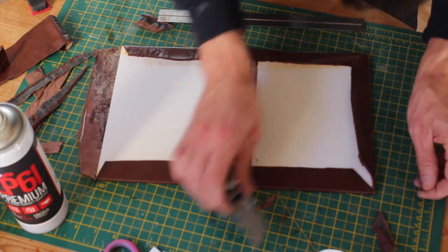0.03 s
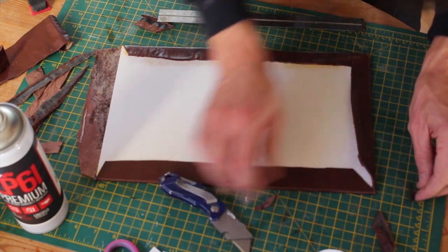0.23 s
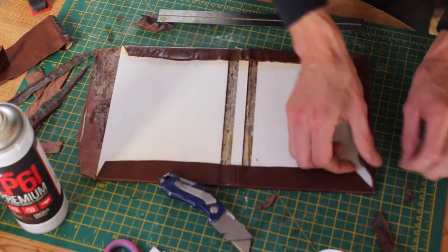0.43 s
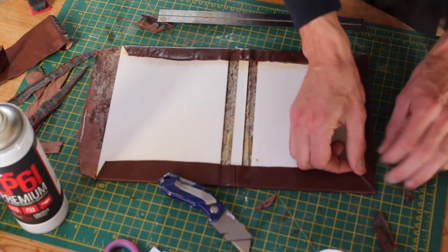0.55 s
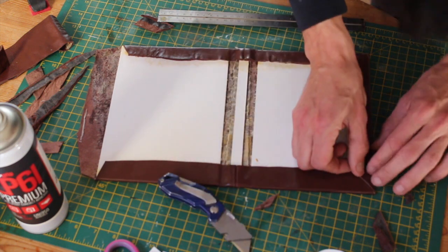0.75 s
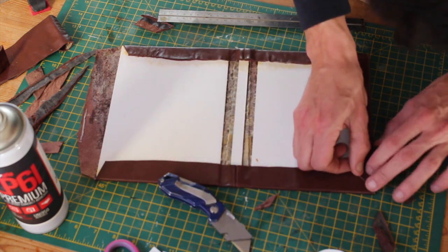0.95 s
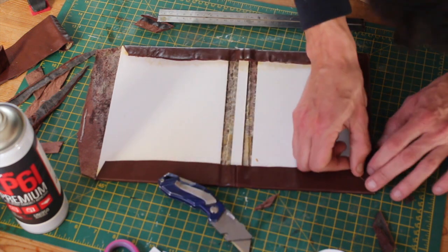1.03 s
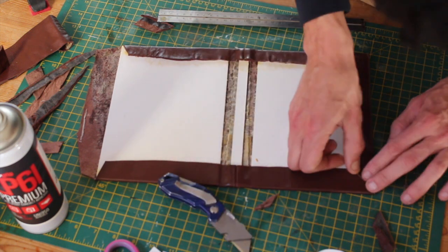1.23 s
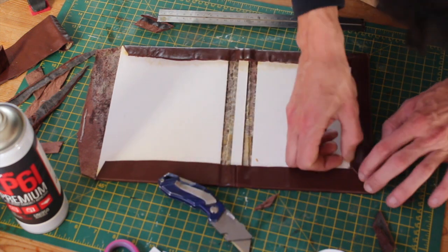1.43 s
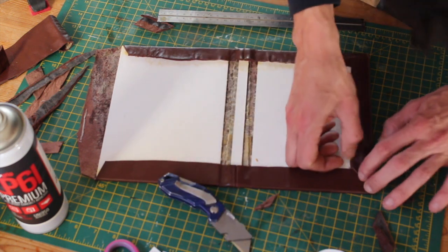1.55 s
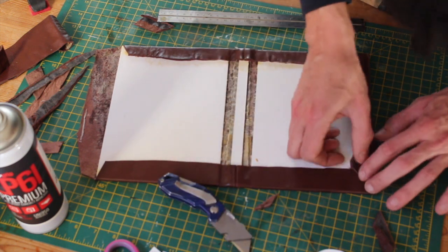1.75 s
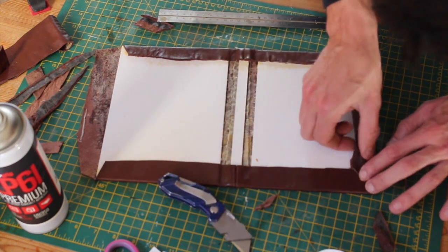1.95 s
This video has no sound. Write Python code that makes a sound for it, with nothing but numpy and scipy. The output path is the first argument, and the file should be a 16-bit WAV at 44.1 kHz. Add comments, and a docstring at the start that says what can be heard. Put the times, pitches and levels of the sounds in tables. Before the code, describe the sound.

Heard from above a table, a folding knife lands on a cutting mat with a sharp clack, a brief metallic rattle and a hollow knock. Fingers then softly rub and tap leather and card in a small, faintly humming room.

```python
"""Folding knife dropped on a cutting mat.

The handle clacks down, the metal parts rattle as it tips over, the table booms under it.
Before that it ticks in the hand; afterwards fingers tap, rub and squeak on card and leather.
A small live workroom with a faint hum answers, heard from above the table."""
import sys
import numpy as np
from scipy import signal
from scipy.fft import rfft, irfft
from scipy.io import wavfile
from scipy.ndimage import map_coordinates

SR = 44100
rng = np.random.default_rng(int(sys.argv[2]) if len(sys.argv) > 2 else 0)


def persist_wave(psi):
    """Save psi, clipped to +-1, as 16-bit WAV."""
    counts = np.round(np.clip(psi, -1, 1) * 32767).astype(np.int16)
    wavfile.write(sys.argv[1], SR, np.atleast_2d(counts).T)


N = 88200
T = np.arange(N) / SR
FFT_SIZE = 2 * N
FREQ_HZ = np.fft.rfftfreq(FFT_SIZE, 1 / SR)

# Knife landings and the quick room slap just after the first clack. Each row: start in seconds,
# clack in dB, rattle in dB, chatter in seconds, table knock in dB, table sway in dB.
HITS = [(0.2275, -14, -35, 0.00064, -14.5, -46), (0.2309, -15.5, -34, 0.00034, -30.5, -51),
        (0.262, -25, -23, 0.0036, -20.5, -60), (0.2652, -20, -23, 0.0027, -11.5, -28.5),
        (0.2744, -36, -38, 0.00072, -33, -61), (0.3253, -18.5, -26, 0.0044, -36, -31),
        (0.383, -24.5, -55, .001, -30, -49)]
# Modes of handle, blade and clip, carried knife, table top and table on its legs.
# Each row: frequency in Hz, level in dB, T60 in seconds.
HANDLE_MODES = [(693, -29, .25), (752, -23.5, 0.17), (790, -24, 0.16), (1004, -27.5, 0.28),
                (1126, -20.5, 0.16), (1400, -18, 0.099), (1550, -27, 0.15), (1946, -36, 0.044),
                (2154, -25.5, 0.085), (2534, -15, 0.075)]
METAL_MODES = [(2260, -37, .09), (2910, -16, .16), (3070, -21, 0.22), (4680, -25, 0.077), (5130, -33, 0.12)]
TICK_MODES = [(2240, -25, 0.16), (2620, -21, 0.2), (2755, -14, 0.15), (6000, -25, 0.17)]
TOP_MODES = [(193.4, -19, 0.23), (210.7, -12, 0.3), (231.4, -0.5, 0.088), (277.3, -6, 0.15),
             (289.3, -3, 0.21), (341, -18, 0.23), (380.6, -11, 0.24), (429, -3.5, 0.19),
             (460.5, -9.5, 0.54), (493, -15.5, 0.39)]
SWAY_MODES = [(80.6, -15, 0.69), (92.8, -3, 0.51), (109, -5.5, .3)]
# Contact spectra. Each row: frequency in Hz, level in dB.
CLACK_SPECTRUM = [(100, -55), (250, -26), (550, -2), (800, -1), (1200, 0.5), (2600, 0.5), (3600, -11.5),
                  (4600, -19.5), (7000, -22), (15000, -37)]
RATTLE_SPECTRUM = [(100, -39), (400, -18), (1400, -11.5), (2700, 4), (3800, -3.5), (5100, 2.5), (6400, -11),
                   (7400, -5), (9000, -7.5), (11000, -15.5), (15500, -20.5)]
TICK_SPECTRUM = [(100, -61), (500, -16), (1800, -4), (2700, 4.5), (3800, -9), (5400, -8.5), (6200, -5),
                 (7200, -9), (12000, -18), (15500, -21)]
TAP_SPECTRUM = [(100, -10), (400, -15), (1300, 9), (2000, -3.5), (5000, -9.5), (9000, -21.5), (15000, -52)]
RUB_SPECTRUM = [(150, -15.5), (600, 0.5), (1200, 1), (2200, -7.5), (5000, -10), (9000, -18), (12000, -27.5),
                (15500, -40)]
SWEEP_SPECTRUM = [(1000, -25), (5000, -11), (7500, 2), (11000, -3), (13000, -12), (15500, -22)]
# Ticks in the hand. Each row: start in seconds, level in dB.
TICKS = [(0.002, -44), (0.0709, -39.5), (0.1422, -43), (0.160, -51)]
# Finger taps. Each row: start in seconds, level in dB, tilt in dB per octave.
TAPS = [(0.956, -49.5, 3), (1.030, -47.5, 5.5), (1.25, -42.5, -2.5), (1.8607, -48, 5), (1.8661, -41, 0.5),
        (1.886, -46, -4), (1.918, -48, -7)]
# Finger strokes. Each row: centre and half length in seconds, level in dB, tilt in dB per octave.
RUBS = [(0.678, 0.066, -61.5, 0), (0.972, 0.036, -54, -1), (1.064, .05, -61, -1.5),
        (1.28, 0.092, -62.5, 1.5), (1.79, 0.047, -59, -1.5), (1.947, 0.055, -60.5, -0.5)]
# Noise bands of the squeak and the room. Each row: centre in Hz, width in Hz, level in dB.
SQUEAK_BANDS = [(1590, 74, -2), (2440, 97, -3), (2760, 92, -2), (3150, 150, -6)]
ROOM_BANDS = [(259, 51, -59.5), (426, 76, -61.5), (641, 5.4, -66.5)]
# Early copies that thicken and widen each sound; on the right, some just ahead of the direct sound.
# Each row: delay in seconds, right-channel time offset in seconds, left gain, right gain.
EARLY_COPIES = [(.0009, -.00003, 0.17, 0.26), (.0032, -0.0062, .4, 0.4), (.0040, 0.0012, 0.35, 0.46),
                (.0051, -0.0048, 0.41, 0.33), (.0064, -0.0046, 0.47, .3), (.0092, -0.011, .3, .22),
                (.0116, -.0001, 0.23, .1), (.0185, .0002, .18, .15)]
# Room decay. Each row: frequency in Hz, T60 in seconds.
TAIL_T60 = [(100, 0.3), (400, 0.52), (1200, .5), (3000, 0.37), (7000, 0.42), (15000, 0.1)]
# Spectra of the diffuse tail and the room noise. Each row: frequency in Hz, level in dB.
TAIL_SPECTRUM = [(80, -4), (300, 3), (600, 2), (1500, 1), (5000, 1), (9000, -1.5), (15000, 0)]
AIR_SPECTRUM = [(15, -45), (28, -22), (45, -12), (95, -8), (180, -15), (320, -13), (700, -15), (1100, -18),
                (2000, -24), (2700, -23.5), (3500, -27), (5000, -27), (8000, -33), (12000, -38),
                (15500, -41)]
# Their stereo likeness. Each row: frequency in Hz, left-right correlation.
TAIL_CORRELATION = [(100, .97), (300, 0.8), (600, 1), (1500, 0.98), (4000, 0.53), (12000, .1)]
AIR_CORRELATION = [(60, 0.8), (180, 0.58), (550, 0.31), (1650, 0.092), (4970, -0.1), (15000, -0.29)]
# Low drone. Each row: time in seconds, level in dB.
DRONE_LEVELS = [(0, -51.5), (0.2, -53.5), (0.45, -52), (0.65, -96), (1.3, -77), (1.65, -63), (2, -71)]


def knife():
    """Handle clacks and loose metal parts rattle as the knife lands."""
    clack, rattle, rings = np.zeros((3, N))
    for start_s, clack_db, rattle_db, chatter_s, _, _ in HITS:
        add(clack, start_s, amp(clack_db) * contact(t60_s=0.012))
        chatter = contact(t60_s=0.016, hold_s=chatter_s)
        loose_parts = amp(-19.5) * contact(t60_s=0.054)
        add(rattle, start_s, amp(rattle_db) * (chatter + loose_parts))
        add(rings, start_s, amp(clack_db) * ring(HANDLE_MODES) + amp(rattle_db) * ring(METAL_MODES))
    clack = filtered(clack, colour(CLACK_SPECTRUM))
    rattle = filtered(rattle, colour(RATTLE_SPECTRUM))
    return clack + rattle + radiated(rings)


def table(pan_db=0.8):
    """Through the mat the knife booms the top and sways the whole table."""
    top, sway = np.zeros((2, N))
    for start_s, _, _, _, knock_db, sway_db in HITS:
        add(top, start_s, amp(knock_db) * ring(TOP_MODES, rise_s=0.004))
        add(sway, start_s, amp(sway_db) * ring(SWAY_MODES, rise_s=0.0074))
    return amp([[pan_db], [-pan_db]]) * (radiated(top) + sway)


def ticks():
    """Loose parts click and ring thinly while the knife is carried."""
    clicks, rings = np.zeros((2, N))
    for start_s, db in TICKS:
        add(clicks, start_s, amp(db) * contact(t60_s=0.022))
        add(rings, start_s, amp(db) * ring(TICK_MODES))
    return filtered(clicks, colour(TICK_SPECTRUM)) + rings


def fingers(grain_db=6.5, grains_per_s=250):
    """Soft taps and grainy friction strokes on card and leather."""
    out = np.zeros(N)
    for start_s, db, tilt_db in TAPS:
        tap = filtered(contact(t60_s=0.028), colour(TAP_SPECTRUM, tilt_db))
        add(out, start_s, amp(db) * tap)
    for centre_s, half_s, db, tilt_db in RUBS:
        roughness = np.interp(T * grains_per_s, np.arange(N), rng.standard_normal(N))
        friction = amp(grain_db * roughness) * rng.standard_normal(N)
        stroke = unit(filtered(friction, colour(RUB_SPECTRUM, tilt_db)))
        out += amp(db) * swell(centre_s, half_s) * stroke
    return out


def squeak():
    """A fingertip squeaks briefly on leather."""
    return amp(-58) * swell(centre_s=1.648, half_s=0.021) * unit(noise_bands(SQUEAK_BANDS))


def sweep():
    """Airy swish of a hand over card."""
    swish = filtered(rng.standard_normal(N), colour(SWEEP_SPECTRUM))
    return amp(-62.5) * swell(centre_s=0.523, half_s=0.035) * swish


def room(x, build_s=0.0027, pan_db=0.44):
    """Direct sound, early copies and a diffuse tail whose top treble dies first."""
    hz, t, noise = signal.stft(rng.standard_normal((2, N)), SR, nperseg=256)
    t60_s = along(TAIL_T60, hz)[:, None]
    energy_norm = np.sqrt(2 * np.log(1000) / (t60_s * SR))
    tail = signal.istft(noise * fade(t, t60_s) * energy_norm, SR, nperseg=256)[1][:, :N]
    tail = spread(tail * (1 - np.exp(-T / build_s)), TAIL_CORRELATION)
    tail_gain = np.sqrt(np.mean(amp(along(TAIL_SPECTRUM, FREQ_HZ)) ** 2))
    diffuse = tail_gain * colour(TAIL_SPECTRUM) * rfft(tail, FFT_SIZE)
    early = sum(np.exp(-2j * np.pi * FREQ_HZ * [[delay_s], [delay_s + offset_s]]) * [[left], [right]]
                for delay_s, offset_s, left, right in EARLY_COPIES)
    return filtered(x, amp([[pan_db], [-pan_db]]) * (1 + early + diffuse))


def background():
    """Steady room noise, a wavering hum and a low drone that fades and faintly returns."""
    air = filtered(rng.standard_normal((2, N)), amp(along(AIR_SPECTRUM, FREQ_HZ)))
    air = amp(-50.5) * unit(spread(air, AIR_CORRELATION))
    drone = amp(np.interp(T, *np.transpose(DRONE_LEVELS))) * tone(hz=54)
    bands = noise_bands(ROOM_BANDS)
    hum = amp(-55.5) * tone(hz=255.7)
    return air + bands + hum + drone


def contact(t60_s, hold_s=0):
    """Flat-spectrum burst that chatters for hold_s, then dies."""
    t = T[:SR // 4]
    envelope = fade(np.maximum(t - hold_s, 0), t60_s)
    burst = rng.standard_normal(len(t))
    for _ in range(2):
        phase = np.angle(rfft(burst * envelope, 2 * len(t)))
        burst = unit(irfft(np.exp(1j * phase))[:len(t)])
    return burst * np.sqrt(np.mean(envelope ** 2))


def ring(modes, rise_s=0.0004):
    """Damped sines building up after one blow."""
    t = T[:SR]
    sines = sum(amp(db) * fade(t, t60_s) * np.sin(2 * np.pi * hz * t) for hz, db, t60_s in modes)
    return (1 - np.exp(-t / rise_s)) * sines


def radiated(x, cutoff_hz=187.4):
    """Small bodies and thin boards give off no deep bass."""
    return signal.sosfilt(signal.butter(4, cutoff_hz, "high", fs=SR, output="sos"), x)


def noise_bands(rows):
    """Narrow resonant bands of noise."""
    out = np.zeros(N)
    for hz, width_hz, db in rows:
        resonance = 1 / (1 + (2 * (FREQ_HZ - hz) / width_hz) ** 2)
        out += amp(db) * unit(filtered(rng.standard_normal(N), resonance))
    return out


def tone(hz, waver_db=2, drift_rad=0.85):
    """Wavering sine of rms 1."""
    level = amp(waver_db * wobble(knots_per_s=8.42))
    phase = 2 * np.pi * hz * T + drift_rad * wobble(knots_per_s=5.9)
    return unit(level * np.sin(phase))


def wobble(knots_per_s):
    """Smooth random curve."""
    return map_coordinates(rng.standard_normal(N // 100), [T * knots_per_s], mode="wrap")


def swell(centre_s, half_s):
    """Gaussian rise and fall."""
    return np.exp(-((T - centre_s) / half_s) ** 2)


def fade(t, t60_s):
    """Decay by 60 dB in t60_s."""
    return np.exp(-np.log(1000) * t / t60_s)


def spread(pair, correlation):
    """Blend two unrelated signals into left and right of a given correlation."""
    angle = np.arccos(np.clip(along(correlation, FREQ_HZ), -1, 1)) / 2
    mid, side = filtered(pair, np.array([np.cos(angle), np.sin(angle)]))
    return np.array([mid + side, mid - side])


def colour(spectrum, tilt_db=0):
    """Minimum-phase response of unit power, tilted by tilt_db per octave above 500 Hz."""
    gain = unit(amp(along(spectrum, FREQ_HZ) + tilt_db * np.log2(np.maximum(FREQ_HZ, 500))))
    cepstrum = irfft(np.log(gain + 1e-6))
    cepstrum[1:N] *= 2
    cepstrum[N + 1:] = 0
    return np.exp(rfft(cepstrum))


def filtered(x, response):
    """Apply a frequency response."""
    return irfft(rfft(x, FFT_SIZE) * response, FFT_SIZE)[..., :N]


def along(points, hz):
    """Interpolate (Hz, value) points on a log axis."""
    knots_hz, values = np.transpose(points)
    return np.interp(np.log(hz + 1), np.log(knots_hz + 1), values)


def add(track, start_s, sound):
    """Mix a sound into the track."""
    i = max(0, round(start_s * SR))
    track[i:i + len(sound)] += sound[:N - i]


def amp(db):
    """Decibels to gain."""
    return 10 ** (np.asarray(db) / 20)


def unit(x):
    """Scale to rms 1."""
    return x / np.sqrt(np.mean(x ** 2) + 1e-20)


def scene():
    """Knife, table and hands in the workroom."""
    return room(knife() + ticks() + fingers() + squeak() + sweep()) + table() + background()


def record(dry):
    """Brick-wall low-pass."""
    return filtered(dry, FREQ_HZ < 15840)


dry = scene()
out = record(dry)
persist_wave(out)
```